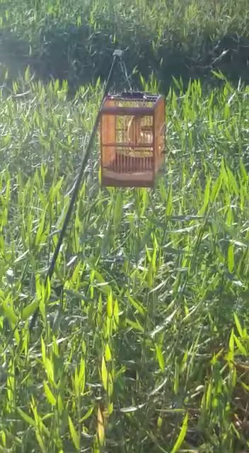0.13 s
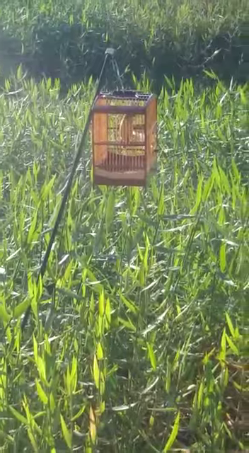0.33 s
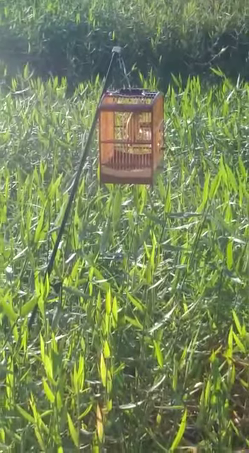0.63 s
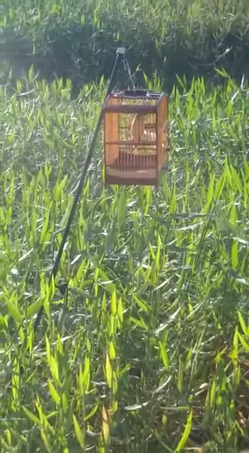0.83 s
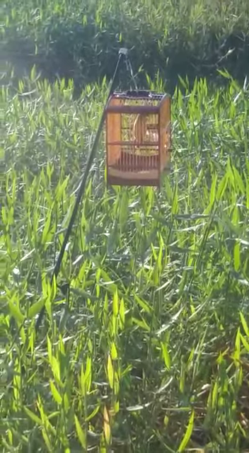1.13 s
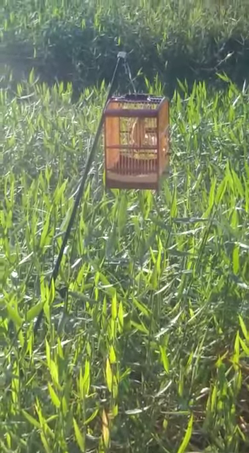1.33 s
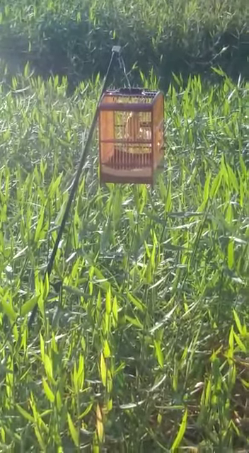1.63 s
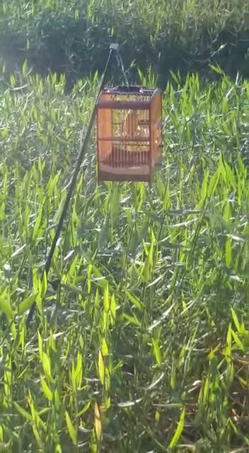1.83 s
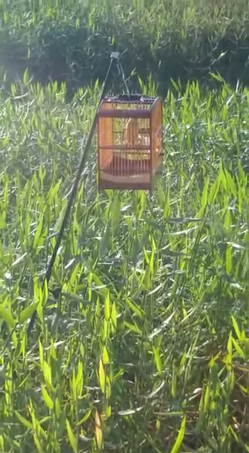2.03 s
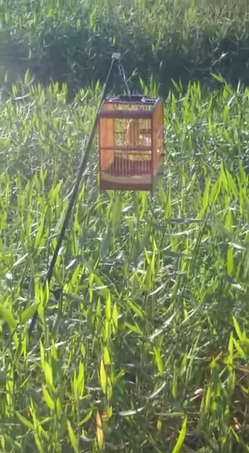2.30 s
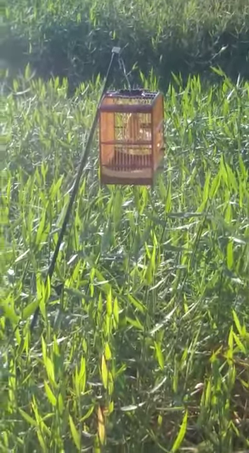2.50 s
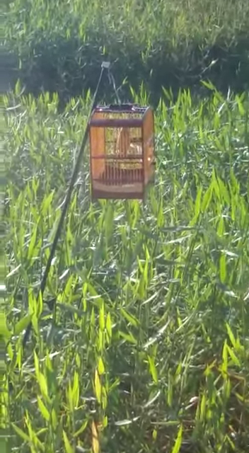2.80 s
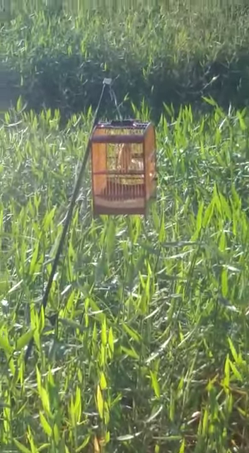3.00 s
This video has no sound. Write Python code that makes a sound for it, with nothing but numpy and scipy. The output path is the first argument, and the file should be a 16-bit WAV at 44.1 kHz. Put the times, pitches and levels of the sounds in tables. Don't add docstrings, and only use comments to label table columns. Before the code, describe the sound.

Crickets trill faintly outdoors, a distant bird calls once, then a nearby caged bird gives sliding pure whistles and a rasping falling buzz, with small perch ticks; close, clear pickup with soft grassy echoes.

```python
import sys
import numpy as np
from scipy import signal
from scipy.fft import rfft, irfft
from scipy.io import wavfile
from scipy.ndimage import uniform_filter1d

SR = 44100
rng = np.random.default_rng(int(sys.argv[2]) if len(sys.argv) > 2 else 0)


def unload_audio(sound):
    columns = np.transpose(np.atleast_2d(sound))
    steps = np.round(np.clip(columns, -1, 1) * 32767)
    wavfile.write(sys.argv[1], SR, steps.astype(np.int16))


def attenuation_scalar(level_db):
    decades = np.asarray(level_db, float) / 20
    return 10 ** decades


N = 138915

# multiple, level in whistles/dB, level in the buzz/dB
HARMONICS = [(2, -27.5, -26), (3, -42, -33.5), (4, -55.5, -34)]


def rms_one(x):
    return x / np.sqrt(np.mean(x ** 2) + 1e-20)


def band(x, low_hz, high_hz):
    return signal.sosfilt(signal.butter(2, [low_hz, high_hz], "band", fs=SR, output="sos"), x)


def in_time(rows):
    s, *columns = np.transpose(rows)
    t = np.arange(N) / SR
    gate = np.clip(np.minimum(t - s[0], s[-1] - t) / 0.004, 0, 1)
    return [np.interp(t, s, c) for c in columns] + [gate]


def drift(rate_hz):
    r = np.exp(-2 * np.pi * rate_hz / SR)
    noise = rng.standard_normal(N + SR)
    return rms_one(signal.lfilter([1], [1, -2 * r, r * r], noise)[SR:])


def coloured(spectrum, side_db=-25):
    hz, db = np.transpose(spectrum)
    f = np.arange(N // 2 + 1) * SR / N + 1e-3
    gain = attenuation_scalar(np.interp(np.log(f), np.log(hz), db, left=-90, right=-90))
    mid, side = irfft(rfft(rng.standard_normal((2, N))) * gain, N)
    return rms_one(mid + attenuation_scalar(side_db) * side * np.array([[1], [-1]]))


def scattered(x, db, t60, rise_s=0.0063, count=2):
    sway_hz = 42
    t = np.arange(int(t60 * SR)) / SR
    envelope = attenuation_scalar(-60 * t / t60) * (1 - np.exp(-(t / rise_s) ** 2))
    out = 0
    for tail in rng.standard_normal((count, len(t))) * envelope:
        tail = tail / np.sqrt(count * np.sum(tail ** 2))
        out = out + drift(sway_hz) * signal.fftconvolve(x, tail)[:N]
    return attenuation_scalar(db) * out


def voice(hz, db, harmonics, sheen_db=0):
    # f/Hz, level/dB
    tint = [(5500, -14.5), (8000, -0.5), (9300, -11.5), (10300, -5.5), (12000, 3.5), (13700, 3.5),
            (15200, 10.5), (19000, -43)]
    tint_hz, tint_db = np.transpose(tint)
    phase = 2 * np.pi * np.cumsum(hz) / SR
    out = attenuation_scalar(db) * np.sin(phase)
    if harmonics:
        effort = uniform_filter1d(attenuation_scalar(db), size=700) * attenuation_scalar(sheen_db)
        for k, level_db in harmonics:
            colour = attenuation_scalar(level_db + np.interp(k * hz, tint_hz, tint_db))
            below_nyquist = k * hz < .45 * SR
            out = out + effort * colour * np.sin(k * phase) * below_nyquist
    return np.sqrt(2) * out


def whistles():
    # t/s, f/Hz, level/dB
    low_notes = [
        [(1.645, 2995, -100.5), (1.651, 3010, -86.5), (1.695, 2998, -52), (1.771, 2865, -39.5),
         (1.813, 2853, -38), (1.823, 2835, -43), (1.83, 2680, -63.5)],
        [(2.053, 3739, -77), (2.064, 3870, -30.5), (2.071, 3860, -24.5), (2.08, 3640, -42),
         (2.093, 3477, -23.5), (2.119, 3383, -26), (2.161, 3309, -36), (2.201, 3341, -35), (2.216, 3090, -73.5)],
        [(2.493, 3730, -69), (2.501, 3920, -28), (2.511, 3836, -23), (2.519, 3740, -44.5), (2.523, 3582, -29),
         (2.539, 3450, -24), (2.561, 3364, -29), (2.599, 3383, -34), (2.61, 3500, -59)],
    ]
    # t/s, f/Hz, level/dB
    high_notes = [
        [(1.904, 4850, -47), (1.913, 5143, -28.5), (1.927, 5016, -24.5), (1.932, 5010, -44), (1.941, 4696, -21),
         (1.959, 4524, -24), (1.983, 4410, -32), (1.995, 4440, -46)],
        [(2.281, 4760, -47), (2.296, 5070, -25), (2.305, 4840, -39.5), (2.318, 4742, -18), (2.332, 4490, -22.5),
         (2.36, 4344, -36), (2.422, 4299, -26), (2.436, 4286, -29), (2.448, 4270, -64)],
    ]
    # t/s, f/Hz, level/dB
    last_note = [(3.125, 4050, -76), (3.142, 4050, -56.5), (3.156, 3976, -27)]
    # 2nd/dB, 3rd/dB, 4th/dB
    sheens = [
        (-1, -0.5, -3),
        (-6, -2.5, -3),
        (-5, -3, 7),
        (-2, 3, 1),
        (1, 3.5, 2),
        (5.5, 2, 4),
    ]
    # t/s, starting f/Hz, level/dB
    breaks = [
        (1.989, 4300, -35.5),
        (2.441, 4330, -30.5),
        (2.8, 3400, -52),
        (2.206, 3100, -55),
        (1.823, 3000, -56),
    ]
    break_s, break_drop = 0.0067, 0.13
    flutter_db, sheen_db = 0.89 * drift(91), 3.5 * drift(60)
    out = 0
    for rows, sheen in zip(low_notes + high_notes + [last_note], sheens):
        hz, swell, on = in_time([(s, f, attenuation_scalar(.75 * db)) for s, f, db in rows])
        db = 20 / .75 * np.log10(uniform_filter1d(swell, size=60))
        harmonics = [(k, level + extra) for (k, level, _), extra in zip(HARMONICS, sheen)]
        out = out + on * voice(uniform_filter1d(hz, size=100), db + flutter_db, harmonics, sheen_db)
    for s, hz, db in breaks:
        hz, db, on = in_time([(s, hz, db), (s + break_s, hz * (1 - break_drop), db - 9)])
        out = out + on * voice(hz, db, [])
    return out


def buzz():
    # t/s, f/Hz, level/dB
    sweep = [(2.757, 8750, -61.5), (2.773, 7930, -34), (2.786, 6830, -20.5), (2.81, 6384, -19),
             (2.847, 5553, -16), (2.884, 4898, -18.5), (2.912, 4590, -16.5), (2.917, 4550, -35),
             (2.928, 4070, -46)]
    # delay/s, level/dB
    cage = [(.0009, -27), (.002, -21.5), (.0033, -6), (.0052, -12), (.0081, -15.5)]
    warble_hz, peak_s, ramp_s, depth_hz = 160.2, 2.2, 0.028, 520
    unevenness, trough_db, chop_db, hollow = 0.062, 3, 0.45, 0.33
    hz, db, on = in_time(sweep)
    t = np.arange(N) / SR
    edge_s = np.minimum(t - sweep[0][0] - .01, sweep[-1][0] - .01 - t)
    depth = np.clip(edge_s / ramp_s, 0, 1)
    turn = 2 * np.pi * warble_hz * (t - peak_s) + 0.05 * drift(27)
    swing = depth * (np.cos(turn) + 0.18 * np.cos(2 * turn) + unevenness * drift(200))
    level_db = db - 4.0 - trough_db * swing + chop_db * depth * drift(179)
    sheen_db = -12 * np.clip((sweep[2][0] + 0.024 - t) / 0.032, 0, 1) + 2.5 * drift(200)
    x = on * voice(hz + depth_hz * swing, level_db, [(k, level) for k, _, level in HARMONICS], sheen_db)
    x = x - hollow * band(x, 7830, 10500)
    x = signal.sosfilt(signal.butter(6, 3700, "high", fs=SR, output="sos"), x)
    return x + sum(attenuation_scalar(g) * np.interp(t - lag, t, x) for lag, g in cage)


def bird_in_grass():
    bird = whistles() + buzz()
    treble = band(band(bird, 7900, 19000), 7900, 19000)
    sheen = scattered(treble, db=-5, t60=.12, count=1)
    near = scattered(bird, db=-17.5, t60=0.11, count=3)
    far = scattered(band(bird, 3600, 12000), db=-25.5, t60=0.3, rise_s=0.024, count=5)
    bird = bird + sheen + near + far
    side = scattered(bird, db=-24.5, t60=.03, count=1) * np.array([[1], [-1]])
    return bird + side


def cricket(phrases, hz, pulses_hz, duty, rise_s, start_drop_hz, arch_hz, rough, echo_db):
    t, out = np.arange(N) / SR, np.zeros(N)
    wobble, grain = drift(80), drift(180)
    for s, length, db in phrases:
        span = (t > s) & (t < s + length)
        u = t[span] - s
        stroke = np.clip(u * pulses_hz % 1 / duty, 0, 1)
        young = np.clip(1 - u / rise_s, 0, 1)
        arch = arch_hz * (2 * stroke - 1) ** 4
        f = hz - start_drop_hz * young ** 2 - arch + 40 * rough * wobble[span]
        shape = np.sin(np.pi * stroke) ** 0.55 * np.clip((length - u) / 0.0029, 0, 1)
        out[span] += shape * voice(f, db - 30 * young + 4 * rough * grain[span], [])
    return out + scattered(out, db=echo_db, t60=.2)


def crickets():
    # t/s, length/s, level/dB
    near = [
        (.465, 0.27, -51),
        (1.168, 0.27, -51),
        (1.842, 0.25, -51.5),
        (2.528, 0.37, -51.5),
    ]
    soft = [
        (-.02, 0.16, -61.5),
        (.747, .17, -64),
        (1.455, 0.21, -65.5),
        (2.11, 0.18, -61.5),
    ]
    upper = [
        (.166, 0.28, -52.5),
        (.699, 0.24, -52),
        (1.228, 0.25, -51),
        (1.74, 0.27, -51.5),
        (2.29, .25, -51.5),
        (2.8, 0.24, -52),
    ]
    upper_soft = [
        (-.1, .25, -59),
        (.44, 0.23, -59),
        (.965, 0.079, -64),
        (1.485, 0.069, -59.5),
        (2.03, 0.12, -71),
        (2.56, 0.11, -76),
    ]
    lower = [
        (-.05, 0.19, -55),
        (.17, 0.13, -59),
        (.44, 0.59, -56),
        (.74, 0.11, -65),
        (.97, 0.31, -56),
        (1.55, 0.25, -56.5),
        (2.17, 0.31, -55),
        (2.7, 0.13, -57),
        (2.9, 0.23, -57),
    ]
    # f/Hz, level/dB per Hz
    chorus = [(3470, -75.5), (5900, -28.5), (6000, -21), (6240, -19), (6440, -10), (6860, -5),
              (7360, -18.5), (7490, -24), (7900, -30), (10300, -57), (17400, -120)]
    t = np.arange(N) / SR
    throb = attenuation_scalar(4.5 * np.sin(2 * np.pi * 51.0 * t + .5 * drift(2.7)) + 1.1 * drift(5.2))
    insects = attenuation_scalar(-60) * throb * coloured(chorus)
    insects = insects + cricket(near, 5574, 58.1, duty=.62, rise_s=0.072, start_drop_hz=424,
                                arch_hz=58.0, rough=0.1, echo_db=-11)
    insects = insects + cricket(soft, 5600, 54.0, duty=0.45, rise_s=.012, start_drop_hz=30.5,
                                arch_hz=59.4, rough=0.41, echo_db=-5)
    insects = insects + cricket(upper, 7095, 46.8, duty=0.98, rise_s=0.0054, start_drop_hz=29.25,
                                arch_hz=400, rough=0.49, echo_db=-8.0)
    insects = insects + cricket(upper_soft, 7070, 47.5, duty=0.4, rise_s=0.0043, start_drop_hz=31.8,
                                arch_hz=292, rough=0.21, echo_db=1)
    insects = insects + cricket(lower, 6680, 45.9, duty=0.86, rise_s=0.004, start_drop_hz=29.14,
                                arch_hz=249, rough=.35, echo_db=-2.0)
    return signal.sosfilt(signal.butter(8, 7950, fs=SR, output="sos"), insects)


def perch_ticks():
    # t/s, peak level/dB, low f/Hz, high f/Hz
    cracks = [
        (2.466, -46, 900, 6900),
        (2.525, -38.5, 400, 2400),
        (2.531, -53.5, 400, 2420),
        (2.527, -58, 8970, 15200),
        (2.546, -67.5, 7900, 15500),
        (2.986, -56, 9000, 15100),
    ]
    length, decay = 300, 57.0
    out = np.zeros(N + length)
    for s, db, low, high in cracks:
        i = int(s * SR)
        crack = rng.standard_normal(length) * np.exp(-np.arange(length) / decay)
        out[i:i + length] += attenuation_scalar(db) * band(crack, low, high)
    return out[:N]


def rustles():
    # t/s, half length/s, level/dB, low f/Hz, high f/Hz
    swells = [(0.331, .007, -65, 360, 520), (0.357, 0.012, -65, 240, 352), (0.856, 0.051, -74.5, 526, 710),
              (0.977, 0.027, -72.5, 280, 350), (1.064, .015, -71.5, 7540, 9000),
              (1.756, 0.033, -68.5, 1100, 1387), (2.18, 0.0042, -55.5, 3760, 4200),
              (2.203, .008, -52.5, 3760, 4100), (2.186, .035, -71.5, 4200, 15000),
              (2.296, .012, -69, 980, 1310), (2.599, 0.015, -61, 1520, 12070),
              (2.629, 0.032, -72.5, 7900, 15500), (3.134, 0.038, -71.5, 8030, 9200)]
    t, noise, out = np.arange(N) / SR, rng.standard_normal(N), np.zeros(N)
    for s, half, db, low, high in swells:
        swell = np.exp(-((t - s) / half) ** 2)
        out += attenuation_scalar(db) * swell * rms_one(band(noise, low, high))
    return out


def far_birds():
    # t/s, f/Hz, level/dB
    call = [(0.205, 1246, -77), (0.223, 1527, -82), (0.235, 2052, -59), (0.249, 2126, -54.5),
            (0.279, 2225, -71), (0.299, 2052, -56), (0.327, 1875, -65), (0.34, 1620, -84)]
    tail = [(0, 1920, -64), (.04, 1936, -87), (.07, 1990, -78)]
    high_chirp = [(1.03, 7430, -74), (1.055, 7800, -64), (1.066, 9050, -87), (1.07, 10000, -87)]
    low_chirp = [(1.108, 4650, -88), (1.122, 5040, -77), (1.13, 5100, -84)]
    out = 0
    for rows in (call, tail, high_chirp, low_chirp):
        hz, db, on = in_time(rows)
        out = out + on * voice(hz, db, [])
    out = out + scattered(out, db=-8, t60=0.25, count=4)
    return out * attenuation_scalar([[1.5], [-1.5]])


def air():
    # f/Hz, level/dB per Hz
    wind = [(15, -47.5), (30, -15), (90, 1), (220, -12.5), (306, -8), (711, -16.5), (1240, -9.5),
            (1730, -21), (5000, -27), (6500, -54), (11000, -120)]
    hiss = [(4820, -26), (8200, -7.5), (10000, -6.5), (13700, -4.5), (15800, -5)]
    return attenuation_scalar(-69.5 + 1.2 * drift(5)) * coloured(wind) + attenuation_scalar(-79.5) * coloured(hiss, side_db=-7)


def scene():
    return bird_in_grass() + crickets() + perch_ticks() + rustles() + far_birds() + air()


def band_limit(x):
    return signal.sosfilt(signal.butter(12, 15940, fs=SR, output="sos"), x)


def record(dry):
    mix = signal.sosfilt(signal.cheby2(10, 50, 16300, fs=SR, output="sos"), dry)
    return band_limit(mix)


dry = scene()
out = record(dry)
unload_audio(out)
```